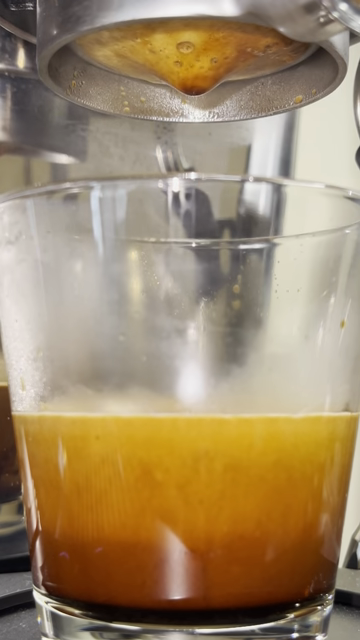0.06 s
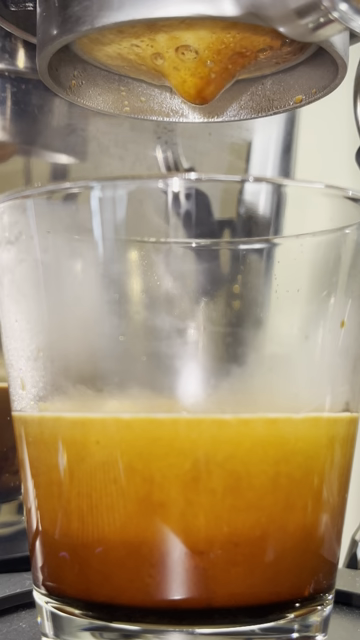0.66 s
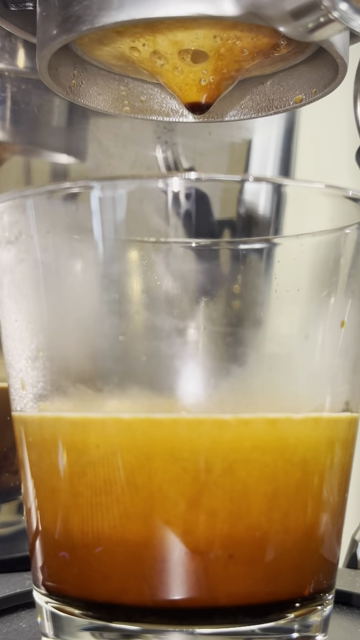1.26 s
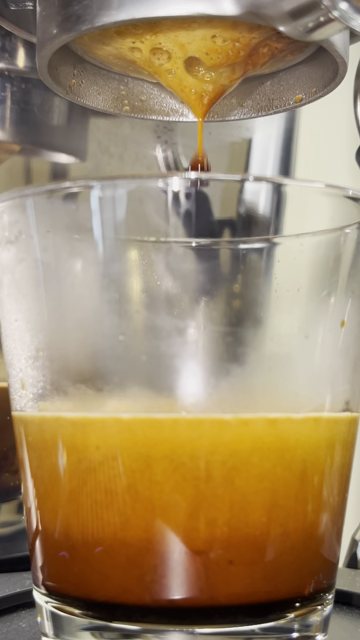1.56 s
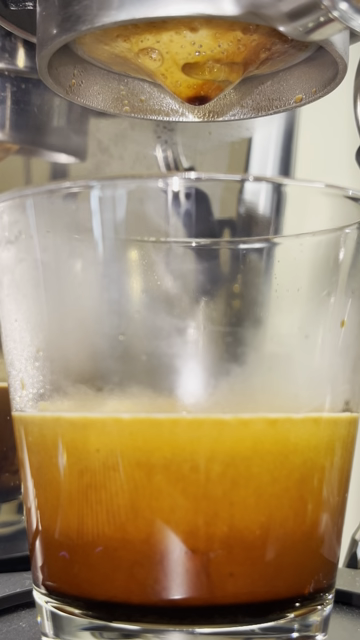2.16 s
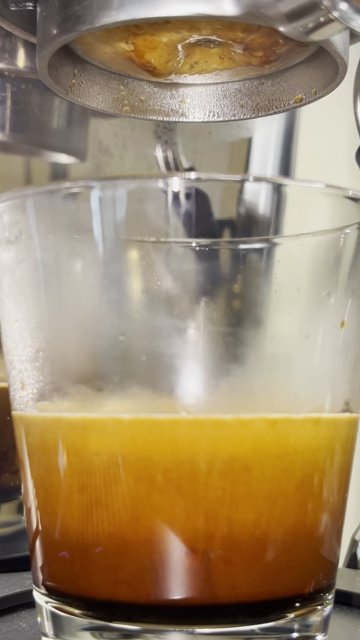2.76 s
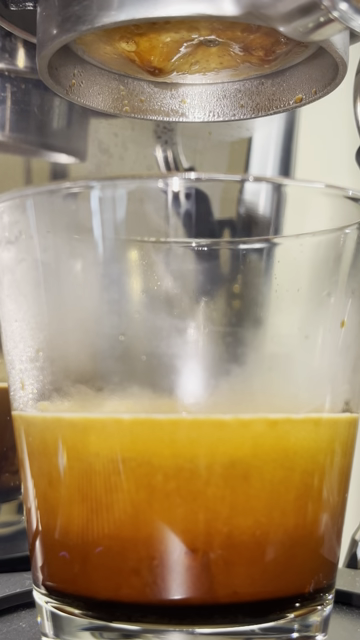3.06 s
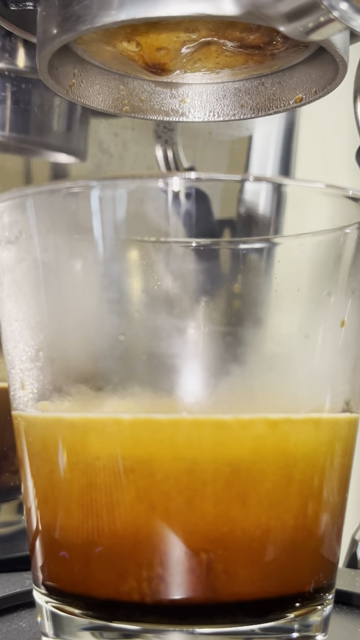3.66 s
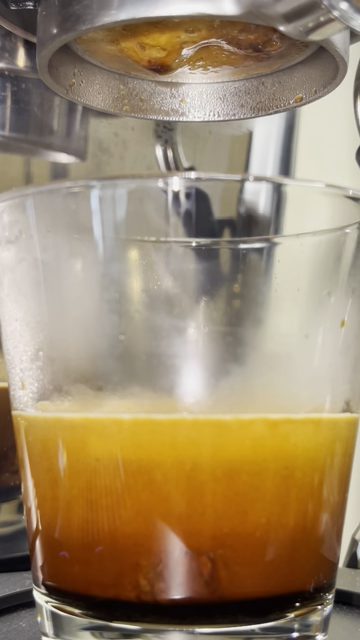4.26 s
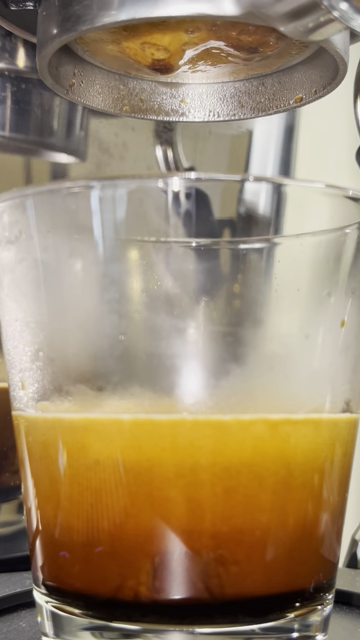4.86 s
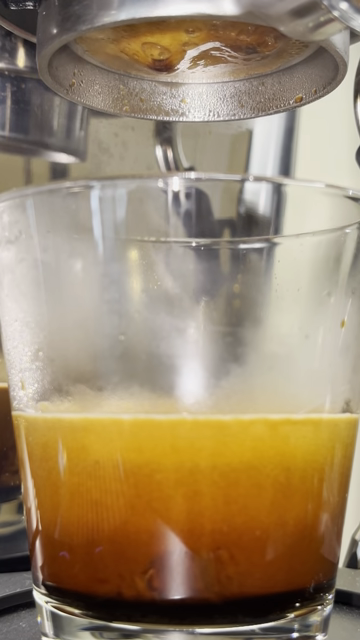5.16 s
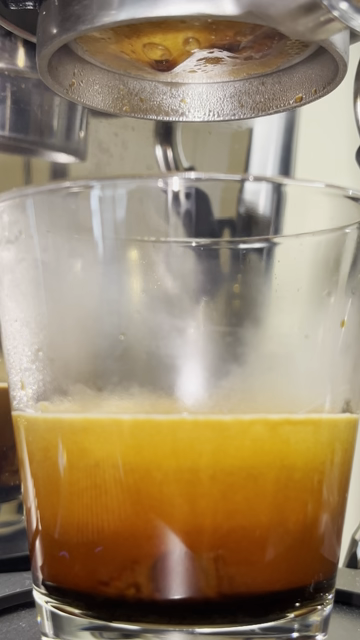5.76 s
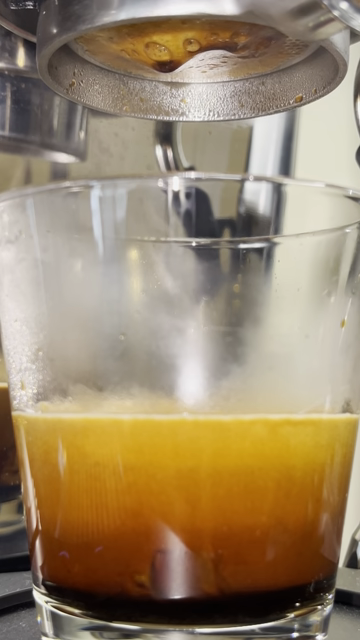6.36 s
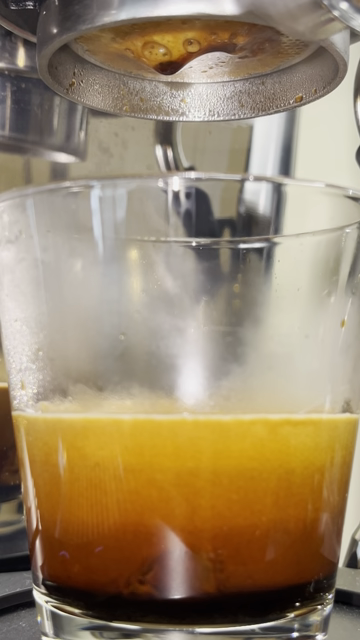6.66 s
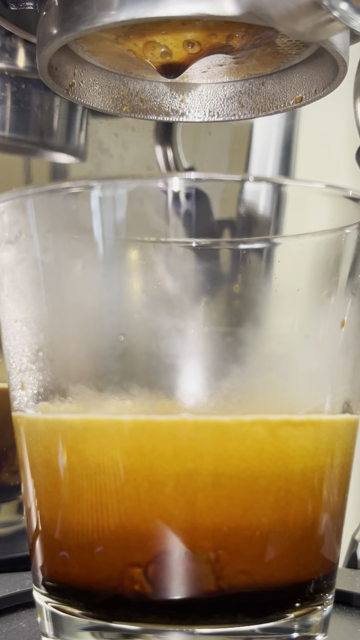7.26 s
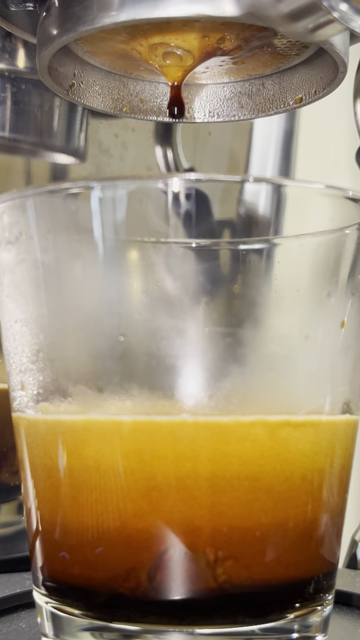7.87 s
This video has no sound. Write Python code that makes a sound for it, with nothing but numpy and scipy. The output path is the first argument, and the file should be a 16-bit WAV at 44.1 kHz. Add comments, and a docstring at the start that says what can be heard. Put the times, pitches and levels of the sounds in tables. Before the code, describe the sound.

Close to an espresso machine in a kitchen, a soft, high steam hiss spits lightly over a low appliance rumble and hum. About a second in, a switch clunks off and briefly rings the housing, followed by a lighter tap. The hiss slowly leaks away into a faint, sputtering fizz, and in the second half three small bubbles burst with sharp, high pings. The rumble carries on underneath.

```python
"""Steam hisses and spits from an espresso machine's brew head, close by in a kitchen, at the end of a shot.
A switch clunks off, ringing the housing, and a coil's faint mains buzz stops with it.
As the pressure falls the hiss dies away into fizz, and a few bubbles burst with sharp, high pings.
Underneath, running appliances rumble and hum."""
import sys
import numpy as np
from scipy import signal
from scipy.fft import rfft, irfft
from scipy.io import wavfile
from scipy.ndimage import uniform_filter1d

SR = 44100
rng = np.random.default_rng(int(sys.argv[2]) if len(sys.argv) > 2 else 0)


def store_pcm(level_fs):
    """Save levels as 16-bit WAV."""
    pcm = np.round(np.clip(level_fs, -1, 1) * 32767).astype(np.int16)
    wavfile.write(sys.argv[1], SR, np.atleast_2d(pcm).T)


N = 357651
TIME, BINS = np.arange(N) / SR, np.fft.rfftfreq(N, 1 / SR)
# four switch contacts, then light taps in the housing: t/s, level/dB, treble corner/Hz, low cut/Hz
CONTACTS = [(0.8911, -9.5, 4000, 190), (0.8933, -1.5, 1710, 190), (0.8962, -1.5, 3720, 184),
            (0.9007, 2, 350, 190), (1.6757, -25.5, 1900, 230), (1.6798, -19.5, 198, 90),
            (2.5215, -35, 2500, 520)]


def amp(db):
    """Decibels to gain."""
    return 10 ** (np.asarray(db) / 20)


def unit(x):
    """Scales to rms 1."""
    return x / np.sqrt(np.mean(x ** 2) + 1e-20)


def read(points, hz):
    """Reads a curve on a log-frequency axis."""
    f, value = np.transpose(points)
    return np.interp(np.log(hz + 1), np.log(f + 1), value)


def bell(offset, width):
    """A smooth hump, half its height at half the width."""
    return np.exp2(-(2 * offset / width) ** 2)


def add(mix, s, sound):
    """Mixes a sound in at time s."""
    part = mix[round(s * SR):][:len(sound)]
    part += sound[:len(part)]


def drift(rate_hz):
    """A random wander of rms 1, mostly slower than rate_hz."""
    return unit(irfft(rfft(rng.standard_normal(N)) / (1 + (BINS / rate_hz) ** 4), N))


def filtered(x, order, hz, kind):
    """A low-, high- or band-pass filter."""
    return signal.sosfilt(signal.butter(order, hz, kind, fs=SR, output="sos"), x)


def ring(modes, t, pitch=1):
    """Struck modes, each a dying sine."""
    return sum(amp(db - 60 * t / t60) * np.sin(2 * np.pi * hz * pitch * t) for hz, db, t60 in modes)


def ports(x):
    """Sound from the machine reaches the two microphone ports out of step."""
    # how far the left port leads: f/Hz, phase/rad
    port_lead = [(0, 0), (1700, 0), (2400, .1), (2900, .75), (4050, .6), (4650, 2), (5080, 4.4),
                 (5600, 6.2), (6200, 6.4), (7600, 8.2), (9000, 9.4), (11600, 11.7), (12300, 12.55)]
    lead = np.interp(BINS, *np.transpose(port_lead))
    return irfft(rfft(x) * np.exp(.5j * np.array([lead, -lead])), N)


def room(x, gap_s, dull_hz, spread):
    """Diffuse kitchen reflections arrive after a gap, each band dying at its own rate."""
    # the kitchen's decay: f/Hz, t60/s
    decay = [(100, 0.27), (200, 0.58), (400, 0.12), (1000, 0.44), (3000, 0.28), (10000, 0.15)]
    hz, t, bands = signal.stft(rng.choice([-1., 1.], (2, SR // 2)), SR, nperseg=512)
    bands = bands * amp(-60 * t / read(decay, hz)[:, None]) / np.hypot(1, hz / dull_hz)[:, None]
    tails = signal.istft(bands, SR, nperseg=512)[1] / np.sqrt(SR / 100)
    tails = np.pad(tails, ((0, 0), (round(gap_s * SR), 0)))
    mid, side = signal.fftconvolve(x[None], tails, axes=1)[:, :N]
    return np.array([mid + spread * side, mid - spread * side])


def jet(bursts_per_s=420, size_spread_db=3, fizz_start_db=-9, fizz_end_db=-3, diffuse_db=-15):
    """Jet noise and a growing share of tiny bursts ring the gap between brew head and glass."""
    # broad colour of the hiss: f/Hz, relative level/dB
    hiss_colour = [(500, -13.5), (1200, -8.5), (2300, -14.5), (4100, -14), (5600, -9.5), (7500, -9.5),
                   (8850, -26), (9450, -4), (10200, 2.5), (10950, -1.5), (12000, -9), (13000, -26.5),
                   (13500, -36)]
    # resonances of the gap: f/Hz, width/Hz, lift/dB
    cavity = [(1520, 93, 4.5), (2010, 330, 4), (2698, 350, 8), (3010, 220, 8.5), (3456, 340, 11.5),
              (3770, 130, 6), (4502, 470, 11), (5070, 490, 9), (5820, 270, 6), (6250, 320, 5.5),
              (6900, 250, 3.5), (8350, 770, 19), (11030, 450, 5)]
    sizes = amp(size_spread_db * np.minimum(rng.exponential(1, N), 4)) * rng.choice([-1, 1], N)
    bursts = sizes * (rng.random(N) < bursts_per_s / SR)
    # each burst lets out a puff of noise that dies in about a millisecond
    puffs = np.sqrt(signal.lfilter([1], [1, -np.exp(-2000 / SR)], bursts ** 2))
    hiss = rng.standard_normal(N)
    fizz = unit(puffs * rng.standard_normal(N))
    share = amp(np.linspace(fizz_start_db, fizz_end_db, N))
    blend = (hiss + share * fizz) / np.hypot(1, share)
    stereo = ports(blend) + amp(diffuse_db) * rng.standard_normal((2, N))
    colour_db = read(hiss_colour, BINS) + sum(db * bell(BINS - hz, width) for hz, width, db in cavity)
    return unit(irfft(rfft(stereo) * amp(colour_db), N))


def steam(level_db=-53.5, shut_s=0.89, leak_db_per_s=2.5, spent_s=5.1, dulling_db_per_octave_s=0.9):
    """The jet holds until the valve shuts, then leaks away, sputtering and dulling as it is spent."""
    # the weakening flow chokes for a moment: t/s, length/s, dip/dB
    chokes = [(6.816, 0.2, -1), (8.06, 0.085, -1.5)]
    hz, t, bands = signal.stft(jet(), SR, nperseg=128)
    flow_db = level_db - leak_db_per_s * np.maximum(t - shut_s, 0)
    flow_db += sum(db * bell(t - at, length) for at, length, db in chokes)
    spent_for = np.maximum(t - spent_s, 0)
    octaves = np.log2(np.maximum(hz, 1000) / 8000)[:, None]
    tilt_db = octaves * (0.74 - dulling_db_per_octave_s * spent_for)
    # a faint band near 13 kHz is lifted more and more toward the end
    top_lift_db = 3.5 * np.outer(bell(hz - 13000, width=2000), spent_for)
    # the colour flickers as tiny openings clog and clear
    patches = uniform_filter1d(rng.standard_normal(tilt_db.shape), size=10, axis=0)
    flicker_db = 0.62 * unit(uniform_filter1d(patches, size=4, axis=1))
    shape_db = flow_db + tilt_db + top_lift_db + flicker_db + spits(hz, t)
    sputter_db = TIME / TIME[-1] * (drift(rate_hz=34) + drift(rate_hz=4.8))  # each grows to 1 dB rms
    return signal.istft(bands * amp(shape_db), SR, nperseg=128)[1][:, :N] * amp(sputter_db)


def rumble(level_db=-55.5, swell_db=1.53, simmer_db=1.1, split_hz=520):
    """Appliance rumble, nearly mono in the bass; the bass swells, the upper part simmers faintly."""
    # colour of the rumble: f/Hz, relative level/dB
    colour = [(20, -13), (42, 2), (65, 3.5), (110, -0.5), (170, -2), (220, -1), (300, -3.5), (400, -3.5),
              (520, -6), (620, -14), (740, -14.5), (950, -22), (1500, -31), (2700, -43), (5000, -48),
              (9000, -76)]
    # its stereo width: f/Hz, side minus mid/dB
    width = [(30, -33), (70, -55), (150, -19.5), (300, -12.5), (500, -9), (800, -2.5), (1200, 2.5),
             (2000, -37)]
    mid, side = rfft(rng.standard_normal((2, N))) * amp(read(colour, BINS))
    side = side * amp(read(width, BINS))
    stereo = np.array([mid + side, mid - side])
    bass_share = 1 / (1 + (BINS / split_hz) ** 4)
    bass = irfft(stereo * bass_share, N) * amp(swell_db * drift(rate_hz=3.5))
    upper = irfft(stereo * (1 - bass_share), N) * amp(simmer_db * drift(rate_hz=12))
    return unit(bass + upper) * amp(level_db)


def compressor(hz=58.3, level_db=-56, beat_s=2.47, beat_db=1.5, crest_s=0.49, slip_rad=.15):
    """A compressor turns just below mains speed, its tone swelling and sinking in a slow beat."""
    strength = amp(level_db + beat_db * np.cos(2 * np.pi * (TIME - crest_s) / beat_s))
    return strength * np.sqrt(2) * np.sin(2 * np.pi * hz * TIME + slip_rad * drift(rate_hz=1.1))


def hum(waver_hz=2.1):
    """Other motors and the mains lay down a bed of tones that waver in strength and phase."""
    # motor and mains tones: f/Hz, rms level/dB, unsteadiness (0-1)
    tones = [(46.4, -61.5, 0.4), (91.3, -61.5, 0.33), (120.4, -71.5, 0.26), (124.5, -71.5, 0.4),
             (148.8, -70, 0.7), (221.5, -68.5, 0.94), (236.3, -67.5, 0.83), (312.8, -70, 1),
             (356.4, -70, 0.36), (371, -74.5, 0), (397.8, -70.5, 0.8), (455, -71.5, 0.65),
             (500.6, -77, 0.5)]
    out = np.zeros(N)
    for hz, db, unsteady in tones:
        wander = (drift(waver_hz) + 1j * drift(waver_hz)) / np.sqrt(2)
        waver = (1 + unsteady * wander) / np.hypot(1, unsteady)
        out += amp(db) * np.sqrt(2) * (waver * np.exp(2j * np.pi * hz * TIME)).real
    return out


def coil_buzz(mains_hz=60, fade_s=0.01):
    """A coil buzzes at harmonics of twice the mains frequency until the switch opens."""
    # partials of the buzz: harmonic number, rms level/dB
    partials = [(5, -75), (6, -80), (9, -81), (10, -79.5), (11, -80), (12, -89), (14, -78), (16, -86)]
    cycles = 2 * mains_hz * TIME
    buzz = sum(amp(db) * np.sqrt(2) * np.sin(2 * np.pi * (k * cycles + rng.random())) for k, db in partials)
    off_s = CONTACTS[1][0]
    return buzz * np.clip((off_s - TIME) / fade_s, 0, 1)


def spits(hz, t, rise_s=0.0016, stray_count=36, stray_width_hz=8600, stray_s=0.006):
    """Spits briefly lift a band of the steam, in dB; weak strays crowd in as the pressure falls."""
    # the clearest spits: t/s, f/Hz, width/Hz, lift/dB, length/s
    clear_spits = [(.169, 8000, 1800, 13, .01), (.597, 7100, 800, 15, .01), (1.538, 7200, 900, 15, .012),
                   (1.82, 1700, 1600, 6, .015), (1.916, 5500, 6000, 6, .004), (2.02, 4500, 4000, 1, .3),
                   (2.105, 4800, 4400, 11, .005), (2.129, 4000, 2200, 9, .005),
                   (2.225, 5800, 2500, 6.5, .005), (2.328, 4400, 3800, 13, .004),
                   (4.223, 4500, 4000, 5, .005), (6.24, 5000, 5000, 6, .006), (6.405, 6000, 5000, 8, .006),
                   (6.521, 7000, 6000, 7, .006), (6.619, 6000, 4000, 9, .005),
                   (7.352, 10500, 5000, 7, .016), (7.416, 7500, 9000, 3.5, .035),
                   (7.668, 5000, 4000, 7, .007), (7.835, 4500, 5000, 6, .009)]
    strays = [(TIME[-1] * when ** 0.2, 6000 * 2 ** (pitch - .5), stray_width_hz, 1.5 * (.5 + size), stray_s)
              for when, pitch, size in rng.random((stray_count, 3))]
    lift_db = np.zeros((len(hz), len(t)))
    for at, centre, width, db, length in clear_spits + strays:
        attack = np.clip(1 + (t - at) / rise_s, 0, 1)
        release = np.exp(-(np.maximum(t - at, 0) / length) ** 2)
        lift_db += db * np.outer(bell(hz - centre, width), attack * release)
    return lift_db


def knocks(rasp_db=-23.5, rasp_t60_s=0.026, top_hz=4700, leak_db=-24, counter_db=-22, walls_db=-16):
    """The switch and later taps ring the housing and rasp; soft contacts lose treble, light ones bass."""
    # modes of the housing: f/Hz, level/dB, t60/s
    housing_modes = [(141, -46, 0.042), (203, -33, 0.063), (295, -23, 0.037), (441, -21, 0.051),
                     (534, -26.5, 0.096), (586, -40, 0.087), (760, -36.5, 0.032), (1240, -39, 0.028),
                     (1600, -45, 0.063), (1740, -25.5, 0.015), (1910, -29, 0.024), (2370, -40, 0.026),
                     (2490, -30, 0.024), (2780, -33, 0.021), (3430, -26, 0.013), (3800, -36, 0.02),
                     (4250, -37, 0.017), (4600, -28.5, 0.031)]
    # far walls that throw back the bass: delay/s, level/dB
    far_walls = [(0.02, -3.5), (0.046, -13), (0.065, -16)]
    t = np.arange(SR // 4) / SR
    direct, boom, echoes = np.zeros((3, N))
    body = ring(housing_modes, t)
    for s, db, corner_hz, low_cut_hz in CONTACTS:
        grit = filtered(rng.standard_normal(len(t)), order=4, hz=900, kind="high")
        rasp = grit * amp(rasp_db - 60 * t / rasp_t60_s)
        softness = np.exp(-2 * np.pi * corner_hz / SR)
        blow = amp(db) * signal.lfilter([1 - softness], [1, -softness], body + rasp)
        add(direct, s, filtered(blow, order=3, hz=low_cut_hz, kind="high"))
        add(boom, s, filtered(blow, order=2, hz=[85, 175], kind="band"))
    # the small panels radiate little high treble
    direct = filtered(direct, order=8, hz=top_hz, kind="low") + amp(leak_db) * direct
    for delay, db in far_walls:
        add(echoes, delay, amp(db) * boom)
    counter = room(direct, gap_s=0.00201, dull_hz=2540, spread=0.48)
    walls = room(direct, gap_s=0.014, dull_hz=202, spread=0.092)
    return ports(direct) + echoes + amp(counter_db) * counter + amp(walls_db) * walls


def bubbles(rise_s=0.00042, snap_db=-12, snap_t60_s=0.0098, wet_db=-13):
    """Larger bubbles burst with a snap and a short, very high ping."""
    # the bursts: t/s, level/dB, pitch ratio
    pops = [(5.1245, -34, 1.0), (5.6808, -33.5, 0.992), (6.4999, -35, 0.998), (6.104, -48, 0.97),
            (6.4053, -48, 1.02), (7.341, -53, 1.01), (7.8342, -52, 0.98)]
    # modes of a bursting bubble: f/Hz, level/dB, t60/s
    bubble_modes = [(6100, -15, 0.0063), (8370, -9, 0.012), (9600, -11, .011), (10300, -5, 0.012),
                    (10770, 1, 0.0093), (11600, -12, .011)]
    t, out = np.arange(SR // 25) / SR, np.zeros(N)
    attack = 1 - np.exp(-(t / rise_s) ** 2)
    for s, db, pitch in pops:
        ping = ring(bubble_modes, t, pitch)
        sizzle = filtered(rng.standard_normal(len(t)), order=3, hz=[8000, 11600], kind="band")
        snap = unit(sizzle) * amp(snap_db - 60 * t / snap_t60_s)
        add(out, s, amp(db) * (ping + snap) * attack)
    return ports(out + amp(wet_db) * room(out, gap_s=.002, dull_hz=14000, spread=0)[0])


def scene(lean_db=0.5):
    """The brew head in front; the rumble and the housing's bass sit a little to the right."""
    # balance of the off-centre housing: f/Hz, left minus right/dB
    housing_balance = [(60, 0), (200, -1.5), (360, -2.7), (640, 1), (1160, 2), (2110, 1), (3810, -.5)]
    housing_pan = amp(read(housing_balance, BINS) * np.array([[.5], [-.5]]))
    room_tone = rumble() * amp([[-lean_db], [lean_db]])
    housing = irfft(rfft(knocks()) * housing_pan, N)
    return room_tone + housing + compressor() + hum() + coil_buzz() + steam() + bubbles()


def record(dry, low_cut_hz=36, top_hz=13500):
    """The microphone sheds the deepest bass, and a steep filter takes off the very top."""
    thinned = irfft(rfft(dry) / np.hypot(1, (low_cut_hz / (BINS + 1)) ** 5), N)
    low_pass = signal.firwin(511, top_hz, window=("kaiser", 9), fs=SR)
    return signal.oaconvolve(thinned, low_pass[None], "same")


dry = scene()
out = record(dry)
store_pcm(out)
```